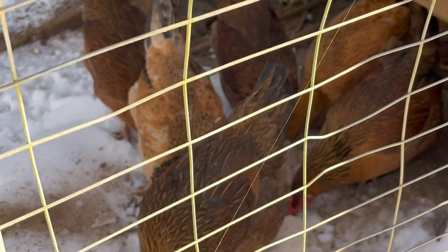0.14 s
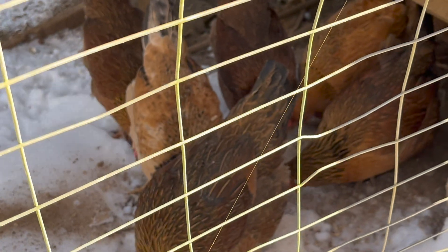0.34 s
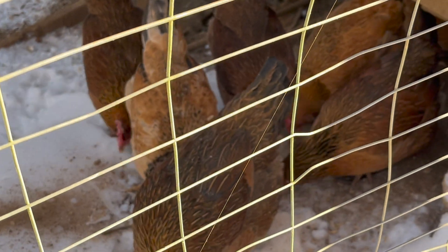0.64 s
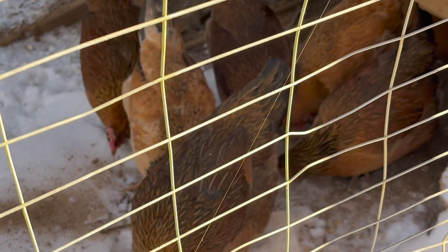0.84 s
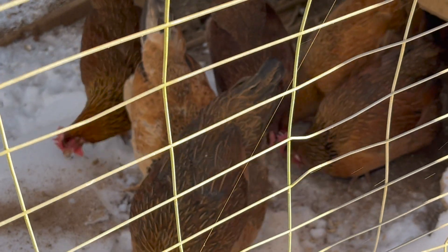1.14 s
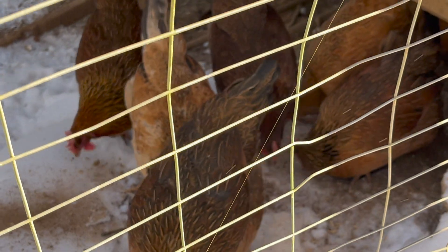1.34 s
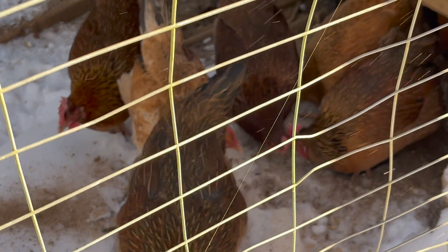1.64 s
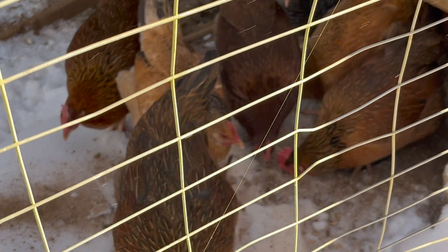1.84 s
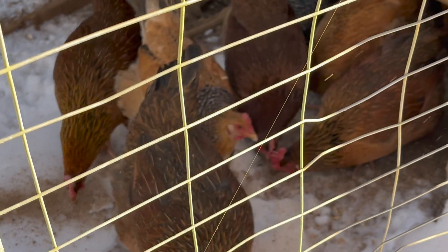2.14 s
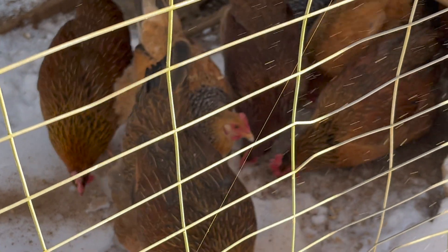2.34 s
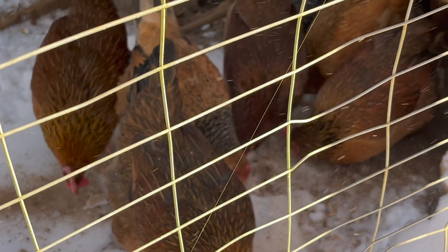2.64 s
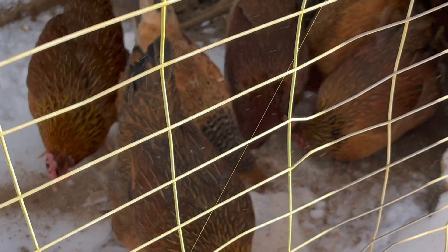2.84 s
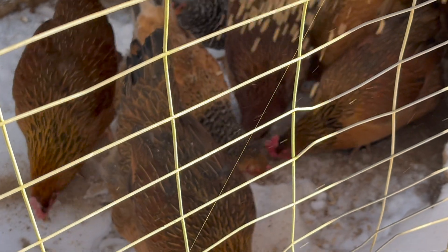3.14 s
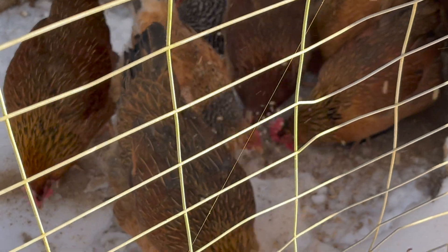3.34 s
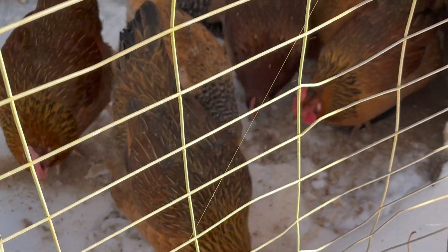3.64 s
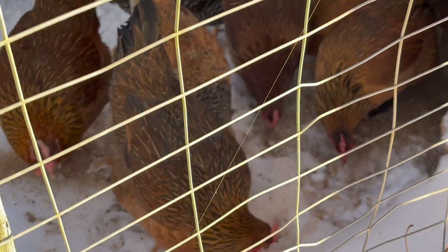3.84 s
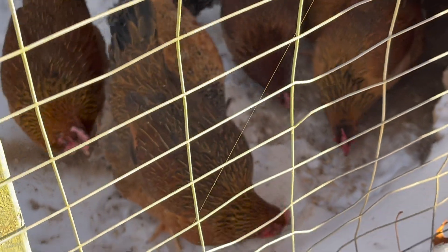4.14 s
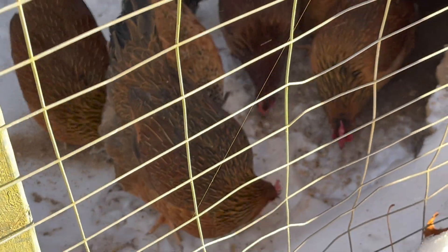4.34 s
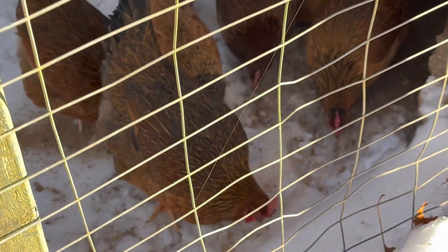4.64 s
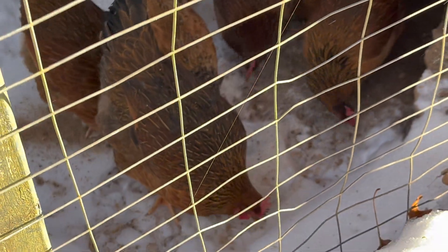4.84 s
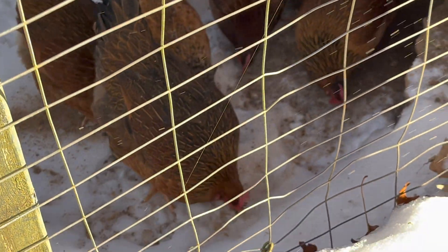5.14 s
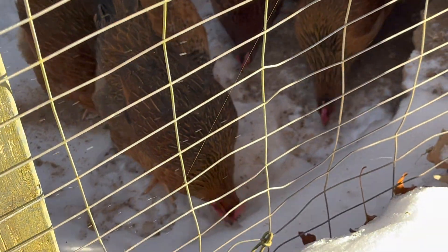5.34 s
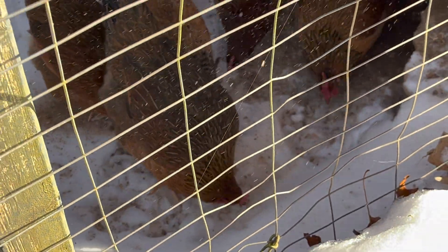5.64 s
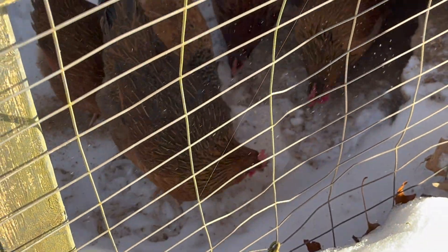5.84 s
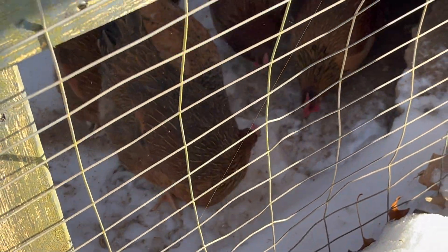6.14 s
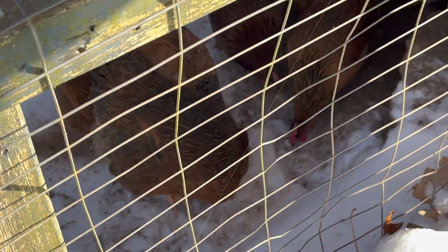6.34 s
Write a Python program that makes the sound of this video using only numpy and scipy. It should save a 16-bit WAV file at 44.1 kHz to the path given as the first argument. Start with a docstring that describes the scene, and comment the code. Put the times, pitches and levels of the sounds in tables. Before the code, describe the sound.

Hens forage on crusted snow a metre or two away, with short clucks, ticking beaks, scraping claws and a soft rustle of feathers. Feed rushes from a faintly ringing scoop three times, and grains patter down after each throw. With the second and loudest throw, one hen starts a long husky call that breaks in pitch, slightly to the right. More clucks follow. Light wind rumbles and thuds on the microphone throughout.

```python
"""Hens feed on snowy ground behind a wire fence, a metre or two away. One draws out a long, husky call
that breaks between registers; others cluck in short glides and throat pulses, with a slap off the coop.
Three times feed rushes out of a ringing scoop, then grains patter down. Beaks tick on the crust, claws
scrape it, feet and feathers rustle. Underneath, a light wind rocks and thuds on the microphone."""
import sys
import numpy as np
from scipy import signal
from scipy.fft import rfft, irfft, next_fast_len
from scipy.io import wavfile
from scipy.ndimage import uniform_filter1d

SR = 44100
rng = np.random.default_rng(int(sys.argv[2]) if len(sys.argv) > 2 else 0)


def output_pcm(signal):
    """Save a mono or channel-first signal as 16-bit PCM at the path in sys.argv[1].

    Samples are clipped to [-1, 1] before scaling.
    """
    pcm = np.clip(np.atleast_2d(signal).T, -1, 1) * 32767
    wavfile.write(sys.argv[1], SR, np.round(pcm).astype(np.int16))


N = 286048
FFT_SIZE = next_fast_len(N)

# wind bed on the microphone: t/s, level/dB
WIND_LEVEL = [(0.0, -42.5), (.09, -34), (.16, -51.5), (0.36, -41), (.44, -59), (0.62, -65), (.7, -51),
              (.8, -49.5), (.9, -43), (1.0, -50), (1.4, -47), (1.9, -47), (1.98, -52.5), (2.1, -51.5),
              (2.22, -54.5), (2.33, -40.5), (2.49, -50), (2.62, -52.5), (3.2, -52.5), (3.55, -49),
              (4.1, -51.5), (4.7, -54.5), (5.2, -51.5), (5.3, -40.5), (5.38, -52.5), (5.94, -52),
              (6.05, -43), (6.11, -58), (6.2, -37), (6.34, -52), (6.49, -36.5)]
# single buffets: t/s, peak/dB, nominal f/Hz, sharp edge/dB re the swing
WIND_BUFFETS = [(0.034, -40, 62.7, -3), (0.082, -31, 72, -20), (.04, -39, 240, -11),
                (0.071, -39.5, 300, -20), (0.184, -35, 59, -28), (0.209, -35.5, 101, -36),
                (0.257, -48, 300, 3), (0.354, -41.5, 207, -25), (0.76, -38.5, 215, -3),
                (0.791, -42, 245, 6), (0.827, -46, 76, -17), (0.902, -50, 70, -15), (0.341, -47, 106, -23),
                (0.938, -39.5, 101, -33), (1.011, -36.5, 77, -24), (1.084, -36, 84, -11),
                (1.189, -44, 71, -18), (1.238, -43, 125, -15), (1.305, -37.5, 95, -7),
                (1.388, -40, 70, -10), (1.454, -41, 62.5, -19), (1.493, -37.5, 115, -6),
                (1.713, -37.5, 106, -3), (1.751, -36.5, 81, -6), (1.799, -38.5, 264, -27),
                (1.801, -33, 89.3, 4.5), (1.903, -32, 76, -8), (2.021, -37.5, 94, -16),
                (2.159, -41, 73.4, -22), (2.228, -47, 260, -24), (2.294, -25, 70.3, -7),
                (2.277, -34.5, 273, -29), (2.351, -36, 94, -14), (2.4, -32.5, 80, -8),
                (2.434, -35, 83.5, -36), (2.459, -33.5, 98, -19), (3.005, -34.5, 109, -7),
                (3.132, -46.5, 106, -7), (3.332, -35, 205, -25), (3.413, -35.5, 61.4, -5),
                (3.488, -37.5, 126.6, -1), (3.553, -34.5, 78.5, -2), (3.695, -37.5, 139.4, -7),
                (3.801, -31.5, 128.2, 7), (3.982, -25.5, 148, -3.5), (4.102, -40, 68, 3),
                (4.495, -38.5, 143.7, -9), (4.942, -47, 96.5, 8), (5.073, -33, 108.8, -4.5),
                (5.248, -35, 173.4, -24), (5.277, -29.5, 72, -4.5), (5.349, -41, 94, -3),
                (5.372, -37.5, 130, -5), (5.575, -47, 90, -10), (5.614, -46, 110, -6),
                (6.012, -34, 231, -20), (6.026, -33.5, 241, -27), (6.018, -32.5, 134, -18.5),
                (6.04, -29, 75, -2.5), (6.071, -45, 200, -1), (6.142, -40.5, 200, -20),
                (6.159, -31.5, 251, -36), (6.183, -37, 142, -1), (6.199, -34, 87.5, 8),
                (6.285, -36.5, 91, 11), (6.366, -28.5, 85, 1), (6.421, -33.5, 111, -34)]
# feet and feathers shuffling in the snow: t/s, level/dB
RUSTLE_LEVEL = [(0.0, -61), (1.0, -61.5), (1.4, -63.5), (1.9, -61), (2.7, -63.5), (3.15, -57), (3.45, -55),
                (4.0, -64), (4.3, -61.5), (5.0, -58.5), (5.35, -57), (5.9, -58), (6.35, -63.5), (6.49, -73)]
# EQ of that rustle: f/Hz, gain/dB
SNOW_EQ = [(120, 1), (300, 4.5), (600, 2), (1000, -3), (2000, -2.5), (4000, -6), (7000, -6.5),
           (11000, -8.5), (14000, -11), (15000, -13)]
# claws scraping the crust: t/s, length/s, level/dB
CLAW_SCRAPES = [(0.089, 0.015, -57.5), (0.457, 0.024, -53), (0.494, 0.084, -58.5), (1.008, 0.1, -60.5),
                (1.114, 0.061, -60), (1.263, 0.083, -56.5), (1.345, 0.14, -62.5), (1.493, 0.064, -54.5),
                (1.683, 0.026, -59), (1.787, 0.14, -58.5), (1.965, 0.066, -51.5), (2.116, 0.034, -57.5),
                (2.187, 0.015, -61), (2.307, 0.012, -55), (2.57, 0.032, -59), (2.61, 0.14, -57.5),
                (3.202, 0.084, -48), (3.316, 0.021, -41), (3.88, 0.14, -56.5), (4.39, 0.23, -58),
                (4.716, 0.038, -53), (5.438, 0.026, -47), (5.475, 0.028, -48), (5.501, 0.081, -52),
                (5.986, 0.04, -50), (6.337, 0.36, -53.5)]
# EQ of the scrapes: f/Hz, gain/dB
CLAW_EQ = [(300, -12), (1500, 7.5), (3000, 2.5), (7000, 5), (11000, 5.5), (14000, 2), (15500, -30)]
# beaks knocking the crust: t/s, level/dB, centre f/Hz
BEAK_PECKS = [(0.0164, -43.5, 2000), (0.1716, -42.5, 2800), (1.111, -38.5, 12100), (1.113, -41, 506),
              (1.412, -50, 590), (1.44, -46.5, 567), (1.5364, -49, 6370), (2.2082, -52, 4300),
              (2.2565, -45, 11500), (2.3652, -50, 10500), (2.5716, -43.5, 2920), (2.808, -45, 2870),
              (2.8444, -45, 4330), (3.133, -34, 4600), (3.1941, -47, 11600), (3.24, -33.5, 3880),
              (4.4066, -43, 3530), (4.4433, -32.5, 10590), (4.716, -45, 5230), (4.948, -44, 11000),
              (4.9658, -41, 4260), (5.015, -38.5, 11400), (5.338, -37.5, 11100), (5.4408, -35.5, 5150),
              (5.475, -30.5, 4450), (5.6542, -34.5, 10890), (6.064, -45, 5320)]
# voiced part of each cluck or croon: t/s, length/s, start f/Hz, end f/Hz, level/dB, octave/dB re level
CLUCK_GLIDES = [(0.305, .06, 960, 950, -69.5, -4), (0.39, 0.056, 895, 890, -71, -6),
                (0.479, 0.24, 996, 942, -71.5, -14), (0.816, 0.1, 1004, 1000, -66, -10),
                (0.104, 0.027, 255, 410, -50.5, 6.5), (1.603, 0.042, 267, 463, -50, -8),
                (1.844, 0.032, 220, 495, -48.5, -12), (4.108, 0.083, 1150, 1093, -66, -36),
                (4.29, 0.18, 1120, 1160, -58, -44), (1.625, 0.031, 760, 927, -45.5, -12),
                (1.854, 0.033, 786, 635, -49, -1), (2.509, 0.044, 540, 574, -54.5, -8.5),
                (2.512, 0.026, 840, 850, -61, -12), (2.626, 0.031, 657, 590, -60, -7),
                (2.685, 0.062, 537, 614, -58.5, 0), (2.769, 0.047, 585, 553, -56, 1.5),
                (2.863, 0.041, 608, 614, -53.5, 7.5), (2.783, 0.072, 1506, 1355, -49.5, -26),
                (2.83, 0.02, 1430, 880, -50, -14), (3.886, 0.049, 980, 755, -52, -30),
                (4.94, 0.062, 912, 909, -60, -9), (5.5, 0.035, 975, 510, -50.5, -18),
                (5.69, 0.02, 1210, 940, -55, -4), (5.697, 0.032, 923, 405.6, -42, -14),
                (5.953, 0.036, 1068, 631, -41, -29), (6.125, 0.04, 1027, 935, -64.5, -23),
                (6.211, 0.017, 1327, 930, -53, -37), (6.22, 0.026, 970, 730, -38, -36),
                (6.235, 0.013, 790, 350, -40, -1.5), (5.981, 0.018, 647, 397, -50, 3),
                (6.397, 0.063, 800, 680, -66, -20)]
# rough catches that open or shut a cluck: t/s, length/s, pulse rate/Hz, relative level/dB
THROAT_CATCHES = [(0.1, 0.032, 295, -42.5), (1.61, 0.026, 296, -45.5), (1.842, 0.021, 319.4, -43),
                  (2.563, 0.062, 288, -62), (2.624, 0.082, 298, -56.5), (2.721, 0.045, 282, -60.5),
                  (2.855, 0.015, 312, -62), (3.062, 0.07, 315, -51), (5.468, 0.025, 403, -49.5),
                  (5.708, 0.01, 312, -39.5), (5.985, 0.011, 314, -45.5), (6.238, 0.0055, 326, -46.5)]
# resonances of the throat: f/Hz, width/Hz, gain/dB
THROAT_FORMANTS = [(575, 314, 13), (1440, 540, 13.5), (1810, 820, 6.5), (2680, 610, -5), (3900, 400, -8.5)]
# louder grains landing: t/s, level/dB, centre f/Hz
LOUD_GRAINS = [(0.4595, -40.5, 4500), (1.257, -41.5, 4340), (1.4289, -40, 3320), (1.5, -49, 4060),
               (1.5673, -38.5, 4120), (1.92, -31.5, 12000), (1.9946, -33, 11760), (2.0102, -31, 12060),
               (3.006, -37, 11770), (3.012, -34, 11000), (3.031, -38, 10500), (3.0924, -32, 9500),
               (3.2573, -28.5, 2900), (3.2614, -21, 6700), (3.2979, -35, 12460), (3.3172, -24, 5900),
               (3.3196, -37, 5200), (3.2257, -45, 5160), (3.349, -36, 11500), (3.3863, -38, 5280),
               (3.4646, -37, 11040), (3.468, -42, 4330), (3.591, -41, 11500), (3.6168, -31, 11400),
               (3.742, -33, 11800), (3.775, -40, 9530), (3.3537, -32, 11400), (3.4014, -24, 10600),
               (3.418, -28.5, 3560), (3.4338, -30.5, 5550), (3.495, -34.5, 5900), (3.5064, -25, 4400),
               (3.519, -35, 3940), (3.5466, -24, 9400), (3.5722, -32, 9300), (3.5627, -40, 3990),
               (3.5778, -34, 7000), (3.6235, -39, 4430), (3.7128, -43, 4900), (3.7285, -42, 4530),
               (3.7843, -43, 3870), (3.8134, -39, 4280), (3.8264, -44, 3950), (3.6302, -31, 10900),
               (3.669, -31, 6530), (3.704, -27, 7500), (3.7498, -20.5, 11780), (3.7977, -31, 4850),
               (4.2507, -38.5, 11150), (5.5183, -27.5, 11050), (5.5325, -29, 5130), (5.5521, -30, 7600),
               (5.543, -28, 10550), (5.566, -30, 6100), (5.68, -39, 6040), (5.696, -40, 10920),
               (5.5952, -35, 4670), (5.613, -26, 11700), (5.727, -31.5, 12090), (5.7698, -30.5, 11000),
               (5.7848, -30, 7100), (5.8066, -29, 11500), (5.8535, -32, 5170), (5.821, -52, 11700),
               (5.845, -53, 6500), (5.9396, -40, 4620), (5.9586, -46, 4190), (6.0122, -32, 10100),
               (6.0298, -34, 10100), (6.1791, -29, 8050), (6.301, -40, 6600), (6.4646, -37, 11300)]
# feed leaving the scoop: t/s, attack/s, t60/s, level/dB, ring/dB re level, hold/s, low modes/dB re ring
FEED_THROWS = [(0.706, 0.018, 1.24, -42.5, -35, 0.064, 6), (2.941, 0.022, 0.29, -29.5, -8, 0.096, 2.5),
               (5.232, 0.0043, 0.33, -41.5, -9, 0.039, -5), (5.248, 0.0074, 0.27, -32.5, -4, 0.039, -10)]
# ringing modes of the scoop: f/Hz, width/Hz, gain/dB
SCOOP_MODES = [(1660, 50, -10), (2060, 90, -9), (2220, 70, -7), (4250, 50, -9), (4510, 50, -9),
               (4780, 55, 0), (4920, 40, -10), (5090, 50, -11), (6820, 250, -9), (11600, 400, -10)]
# EQ of the pouring feed: f/Hz, gain/dB
FEED_EQ = [(200, -6.5), (600, 1), (2000, 0.5), (3200, -1), (5000, -2.5), (8000, -1), (12000, -2),
           (14500, -11), (16000, -26)]
# showers of small grains after a throw: start t/s, end t/s, grain count, top level/dB
GRAIN_SHOWERS = [(0.75, 0.991, 22, -46), (1.25, 2.048, 69, -44.5), (3.153, 3.862, 190, -45.5),
                 (4.35, 5.109, 25, -45), (5.424, 5.873, 67, -39.5), (5.873, 6.479, 39, -44)]
# long call, one list for each register it breaks into: t/s, f/Hz, fundamental level/dB, octave level/dB
CALL_REGISTERS = [
    [(2.93, 608, -50, -49.5), (3.09, 651, -55.5, -62.5), (3.19, 613, -50.5, -45.5), (3.27, 651, -61, -49.5),
     (3.32, 656.3, -45.5, -53.5), (3.445, 675.5, -45, -38.5), (3.57, 652.6, -45, -48.5),
     (3.79, 642, -50.5, -46.5), (3.975, 656.6, -47, -49)],
    [(3.985, 691.4, -44.5, -40), (4.03, 691, -58.5, -46.5), (4.13, 696.8, -54.5, -46.5),
     (4.23, 696, -54.5, -45), (4.35, 706.8, -46.5, -43), (4.51, 699.4, -46, -44.5)],
    [(4.525, 652.4, -42.5, -42), (4.70, 641.2, -45.5, -44), (4.745, 624.3, -55, -43.5),
     (4.775, 587, -50.5, -40.5), (4.825, 658, -50, -41), (4.86, 652, -52, -43), (4.882, 607, -43.5, -30),
     (4.925, 568.5, -66, -65)],
    [(4.95, 498, -58.5, -62), (5.02, 531.6, -57.5, -66), (5.13, 528.6, -56, -68), (5.18, 563, -93, -81),
     (5.25, 532, -39, -64)],
]
# held states of the syrinx: t/s, third partial/dB, half-pitch lines/dB (both re the octave), roughness
SYRINX_STATES = [(2.93, -2, -28, 0.45), (3.15, -44, -15, 0.44), (3.3, -36, -45, 0.069),
                 (3.53, -16.5, -31, 0.18), (3.66, -7.5, -19, 0.2), (3.981, -33, -29, 0.21),
                 (4.05, -22, -36, 0.11), (4.401, -24, -42, 0.26), (4.51, -14, -25.5, 0.23),
                 (4.621, 0.5, -17.5, 0.21), (4.67, -4, -53, 0.078), (4.752, -23, -18, 0.42),
                 (4.81, -19, -30, 0.45), (4.869, -42, -41, 0.12), (4.94, -16, -32, 0.23)]
# windpipe resonance that lifts the upper partials: t/s, centre f/Hz, level/dB re the octave
WINDPIPE_FORMANT = [(3.5, 4200, -34), (3.7, 4050, -24), (4.48, 4300, -28), (4.54, 4450, -21),
                    (4.67, 4450, -21), (4.72, 4300, -32), (4.79, 3700, -34), (4.83, 3450, -27),
                    (4.88, 3400, -40)]
# the caller's head turns, panning the band around the octave: t/s, right over left/dB
HEAD_PAN = [(3.2, 0), (3.9, 6), (4.05, -6), (4.4, 3.5), (4.57, 13), (4.78, 3), (4.9, -1)]
# EQ of the part that differs between left and right: f/Hz, gain/dB
WIDTH_EQ = [(60, -23), (150, -12), (400, -12), (1000, -5.5), (1500, -3), (1900, -4), (4500, -42),
            (6000, -20.5), (12000, -11.5), (14000, -17)]
# the left channel lags the right by a frequency-dependent phase: f/Hz, left minus right phase/rad
STEREO_PHASE = [(0, 0), (1120, -0.6), (1550, -2.5), (1810, -6.0), (5080, -6.3), (5770, -7.2), (6980, -7.6),
                (8100, -9.3), (8870, -9.7), (11200, -12.3), (12300, -12.7), (13000, -13.2), (14600, -15.4),
                (16100, -15.8)]


def undb(db):
    """Decibels to gain."""
    return 10 ** (np.asarray(db) / 20)


def unit(x):
    """Scale to rms 1."""
    return x / np.sqrt(np.mean(x ** 2))


def curves(table):
    """One automation curve per column after the time."""
    times, *columns = np.transpose(table)
    return [np.interp(np.arange(N) / SR, times, column) for column in columns]


def eq_gain(table):
    """Gain of an EQ table at every FFT bin."""
    hz, db = np.transpose(table)
    bins_hz = np.arange(FFT_SIZE // 2 + 1) * SR / FFT_SIZE
    return undb(np.interp(np.log(bins_hz + 1), np.log(hz + 1), db))


def colour(x, table):
    """Run a sound through an EQ table; rms 1."""
    return unit(irfft(rfft(x, FFT_SIZE) * eq_gain(table), FFT_SIZE)[:N])


def band(x, hz, width_hz):
    """One resonant band-pass."""
    return signal.lfilter(*signal.iirpeak(min(hz, .45 * SR), hz / width_hz, SR), x)


def wander(rate_hz):
    """Slewed random sample-and-hold; spread near 1."""
    hold = int(SR / rate_hz)
    return 1.3 * uniform_filter1d(np.repeat(rng.standard_normal(N // hold + 1), hold), hold)[:N]


def crackle(per_s, spread_db):
    """Sparse impulses, a few much larger than the rest."""
    size_db = spread_db * rng.exponential(size=N).clip(0, 3)
    return (rng.random(N) < per_s / SR) * rng.standard_normal(N) * undb(size_db)


def add(out, start_s, sound):
    """Lay a sound into a track."""
    i = max(int(start_s * SR), 0)
    out[i:i + len(sound)] += sound[:N - i]


def wind_bed(lull_db=4, thump_db=-13.5, thump_wander_db=4):
    """Eddies rock the membrane near 60 Hz; the small sharp ones come as separate thumps above it."""
    level = undb(curves(WIND_LEVEL)[0] + lull_db * wander(22).clip(-3, .7))
    thump_gain = undb(thump_db + thump_wander_db * wander(12))
    rocking = band(band(rng.standard_normal(N), 62, 50), 68, 90) * undb(2.5 * wander(18))
    eddies = unit(crackle(110, .8)) + .4 * rng.standard_normal(N)
    thumps = band(band(band(eddies, 127, 160), 225, 266), 190, 480)
    return level * (unit(rocking) + thump_gain * 3 * np.tanh(unit(thumps) / 3))


def wind_buffets(scatter_s):
    """Each buffet swings the membrane through a few dying cycles that sink in pitch."""
    out = np.zeros(N)
    delays = scatter_s * rng.standard_normal(len(WIND_BUFFETS))
    for (start, peak_db, hz, edge_db), delay in zip(WIND_BUFFETS, delays):
        periods = np.arange(int(4 * SR / hz)) * hz / SR
        swing = np.sin(2 * np.pi * (1.271 * periods - .1 * periods ** 2)) * np.exp(-periods / 1.82)
        edge = np.sin(2 * np.pi * (3.104 * periods - .5 * periods ** 2)) * np.exp(-periods / 1.1)
        thud = (swing + undb(edge_db) * edge) * np.minimum(periods / .42, 1) ** 2
        add(out, start + delay, undb(peak_db) * thud / abs(thud).max())
    return out


def snow_rustle():
    """Feet and feathers in the snow: a soft hiss with fine crunching in it."""
    hiss = rng.standard_normal(N) * undb(1.5 * wander(40)) + 1.5 * crackle(600, 4.5)
    return colour(hiss, SNOW_EQ) * undb(curves(RUSTLE_LEVEL)[0])


def claw_scrapes():
    """Claws drag over the crust in bright, grainy swells."""
    envelope = np.zeros(N)
    for start, length, db in CLAW_SCRAPES:
        add(envelope, start, undb(db) * np.sin(np.linspace(0, np.pi, int(length * SR))) ** 1.36)
    grit = rng.standard_normal(N) * undb(4 * wander(110).clip(-3, 1.5)) + 3 * crackle(1500, 3.5)
    return colour(grit, CLAW_EQ) * envelope


def crust_ticks(hits, body_db, snap_db=-7):
    """A beak or grain hits the crust: a wide snap, a tuned crack trailing crumbs, and a duller body."""
    out, t = np.zeros(N), np.arange(900) / SR
    for (start, db, hz), noise in zip(hits, rng.standard_normal((len(hits), 3, len(t)))):
        crumbs = .26 * (1 + 4 * (abs(noise[2]) > 2.4)) * np.exp(-t / .004)
        width_hz = hz * (.42 + .12 * noise[1, -1]).clip(.15, .7)
        crack = band(noise[0] * (np.exp(-t / .0006) + crumbs), hz, width_hz)
        snap = np.diff(noise[2] * np.exp(-t / .00025), prepend=0)
        body = band(noise[1] * np.exp(-t / .0041), 650, 1300)
        layers = (0, crack), (snap_db, snap), (body_db, body)
        add(out, start, undb(db) * sum(undb(trim) * x / abs(x).max() for trim, x in layers))
    return out


def clucks():
    """The voiced part of the clucks: short hoarse glides with their octave."""
    out = np.zeros(N)
    for start, length, from_hz, to_hz, db, octave_db in CLUCK_GLIDES:
        progress = np.linspace(0, 1, int(length * SR))
        phase = 2 * np.pi * np.cumsum(from_hz + (to_hz - from_hz) * progress) / SR
        tone = np.sin(phase) + undb(octave_db) * np.sin(2 * phase)
        add(out, start, np.sqrt(2) * undb(db) * np.sin(np.pi * progress) ** .5 * tone)
    return out * (1 + .25 * wander(300))


def throat_catches(makeup_db=25.5):
    """Swelling bursts of uneven pulses ring the formants of the throat."""
    pulses = np.zeros(N)
    for start, length, rate_hz, db in THROAT_CATCHES:
        jitter, shimmer_db = rng.standard_normal((2, 20))
        times = (np.cumsum(1 + .237 * jitter.clip(-2, 2)) - 1) / rate_hz
        inside = (times >= 0) & (times < length)
        swell = np.sin(np.pi * (.22 + .76 * times[inside] / length))
        samples = ((start + times[inside]) * SR).astype(int)
        pulses[samples] += swell * undb(db + makeup_db + shimmer_db[inside])
    return sum((-1) ** k * undb(db) * band(pulses, hz, width)
               for k, (hz, width, db) in enumerate(THROAT_FORMANTS))


def feed_throws(treble_t60_s=.35, grip_below_hz=4500):
    """A rush of grains dulls as it thins out; the scoop rings on, its low modes set by the grip."""
    rush = unit(rng.standard_normal(N) + 1.1 * crackle(1500, 3.5)) * undb(1.5 * wander(200))
    pour_env, treble_env, high_env, low_env = np.zeros((4, N))
    t = np.arange(SR // 2) / SR
    for start, attack, t60, db, ring_db, hold, low_db in FEED_THROWS:
        shape = np.minimum(t / attack, 1) ** .76 * undb(db - 60 * np.maximum(t - attack, 0) / t60)
        flow = shape * undb(-60 * np.maximum(t - attack - hold, 0) / .5)  # dies faster once empty
        dulling = undb(-60 * np.maximum(t - 2 * attack, 0) / treble_t60_s).clip(.45)
        add(pour_env, start, flow)
        add(treble_env, start, flow * dulling)
        add(high_env, start, shape * undb(ring_db))
        add(low_env, start, shape * undb(ring_db + low_db))
    modes = np.array([undb(db) * band(rush, hz, width) / np.sqrt(width) for hz, width, db in SCOOP_MODES])
    modes /= np.sqrt(np.mean(modes.sum(axis=0) ** 2))
    is_low = np.array(SCOOP_MODES)[:, 0] < grip_below_hz
    ring = high_env * modes[~is_low].sum(axis=0) + low_env * modes[is_low].sum(axis=0)
    pour = colour(rush, FEED_EQ)
    treble = band(pour, 11500, 7000)
    jostle = undb(2.5 * wander(60))
    return pour_env * (pour - treble) + treble_env * treble + jostle * ring


def grain_patter():
    """Many small grains land on the crust at random moments, levels and pitches."""
    hits = []
    for start, end, count, db in GRAIN_SHOWERS:
        when, softness, pitch = rng.random((int(count), 3)).T
        hits += zip(start + (end - start) * when, db - 12 * softness, 3000 * 4.5 ** pitch)
    return crust_ticks(hits, body_db=-43)


def syrinx_curves(slide_s=.03):
    """The syrinx holds each state, then slides quickly into the next."""
    times, *columns = np.transpose(SYRINX_STATES)
    state = (np.searchsorted(times, np.arange(N) / SR) - 1).clip(0)
    return [uniform_filter1d(column[state], int(slide_s * SR)) for column in columns]


def long_call(flutter_db=1.3, upper_floor_db=-37, upper_half_db=20, half_width_hz=550):
    """A hen's drawn-out note; strong-weak cycles add half-pitch lines, roughness shakes pitch and level."""
    t, contour = np.arange(N) / SR, np.vstack(CALL_REGISTERS)
    hz, fundamental_db, octave_db = curves(contour)
    third_db, half_db, rough = syrinx_curves()
    rough = rough.clip(0, 1)
    pipe_hz, pipe_db = curves(WINDPIPE_FORMANT)
    phase = 2 * np.pi * np.cumsum(hz * (1 + .001 * wander(30) + .02 * rough * wander(250))) / SR
    tone = np.zeros(N)
    for k, db in enumerate((fundamental_db, octave_db, octave_db + third_db), 1):
        shake_db = 3.5 * k * rough * wander(70) + (k > 1) * flutter_db * wander(130)
        tone += undb(db + shake_db) * np.sin(k * phase)
    for k in np.arange(7, 19) / 2:  # upper partials, lifted by the windpipe and husky with breath
        lift = undb(upper_floor_db) + undb(pipe_db) / (1 + ((k * hz - pipe_hz) / half_width_hz) ** 2)
        db = octave_db + (half_db + upper_half_db if k % 1 else 0) + 2 * wander(20)
        tone += lift * undb(db) * (1 + .8 * wander(400)) * np.sin(k * phase)
    half_lines = np.sin(1.5 * phase) + .77 * np.sin(2.5 * phase)
    tone += undb(octave_db + half_db + wander(41.05)) * half_lines
    air_rasp = unit(band(rng.standard_normal(N), 1180, 300))
    tone += undb(octave_db - 5.5) * rough * air_rasp
    fade = np.clip(np.minimum(t - contour[0, 0], contour[-1, 0] - t) / .011, 0, 1)
    return np.sqrt(2) * tone * fade * undb(2 * rough * wander(120))


def coop_echo(voices, level_db=-10, t60_s=.12):
    """The voices bounce off the coop: a short stereo tail after 4 ms of pre-delay."""
    t = np.arange(SR // 5) / SR
    tail = rng.standard_normal((2, len(t))) * undb(-60 * t / t60_s) * (t > .004)
    return undb(level_db) * signal.fftconvolve(tail / np.linalg.norm(tail[0]), voices[None])[:, :N]


def ground_and_wind(scatter_s=0):
    """Submix of feed, loud grains, pecks, feet and wind, with fresh noise at every call."""
    feed = feed_throws() + crust_ticks(LOUD_GRAINS, body_db=-55)
    foraging = crust_ticks(BEAK_PECKS, body_db=-5) + snow_rustle() + claw_scrapes()
    return feed + foraging + wind_bed() + wind_buffets(scatter_s)


def scene(call_right_db=2, cluck_right_db=.5):
    """Voices sit to the right over a wide bed; the left channel lags by a frequency-dependent phase."""
    side = np.array([[-.5], [.5]])  # left, right
    call, cluck = long_call(), clucks() + throat_catches()
    head_turn = band(call, 1420, 450) * (undb(curves(HEAD_PAN)[0] * side) - 1)
    voices = (call + head_turn) * undb(call_right_db * side) + cluck * undb(cluck_right_db * side)
    mix = rfft(voices + coop_echo(call + cluck) + ground_and_wind() + grain_patter(), FFT_SIZE)
    width = ground_and_wind(scatter_s=.0063)  # buffets reach the two sides a little apart
    mix += 2j * side * eq_gain(WIDTH_EQ) * rfft(width, FFT_SIZE)
    bins_hz = np.arange(FFT_SIZE // 2 + 1) * SR / FFT_SIZE
    phase_offset = np.interp(bins_hz, *np.transpose(STEREO_PHASE))
    return irfft(mix * np.exp(-1j * phase_offset * side), FFT_SIZE)[:, :N]


def record(dry):
    """The phone cuts the bass below 40 Hz and the top above 16.3 kHz."""
    dry = signal.sosfilt(signal.butter(2, 40, "high", fs=SR, output="sos"), dry)
    return signal.sosfilt(signal.ellip(8, .2, 70, 16300, fs=SR, output="sos"), dry)


dry = scene()
out = record(dry)
output_pcm(out)
```